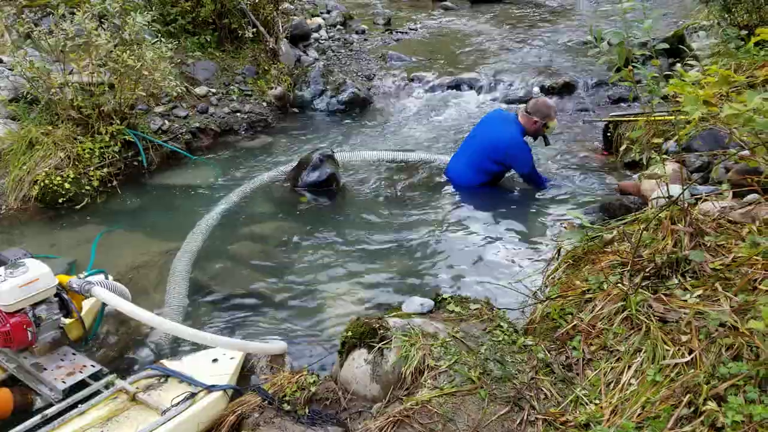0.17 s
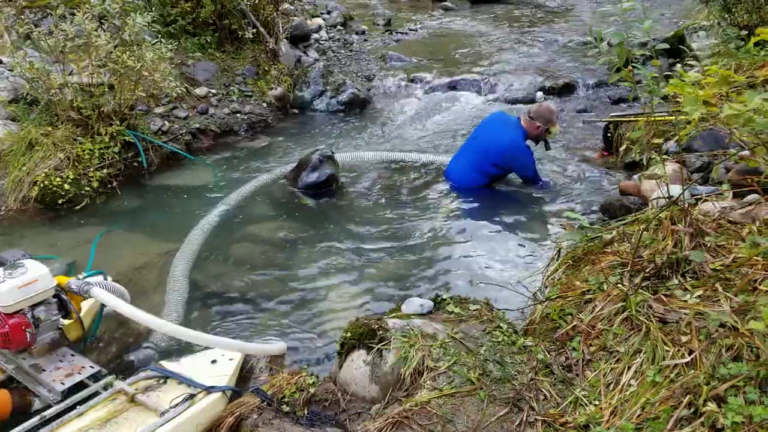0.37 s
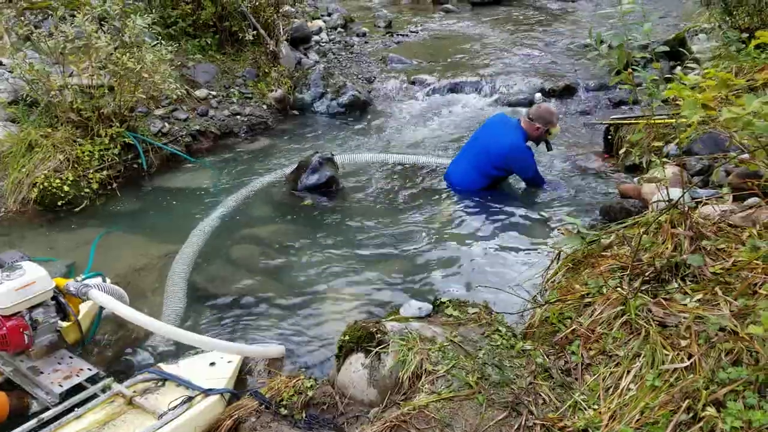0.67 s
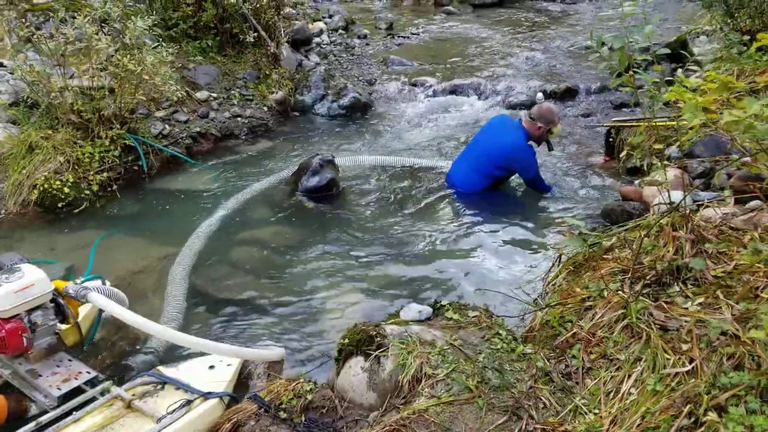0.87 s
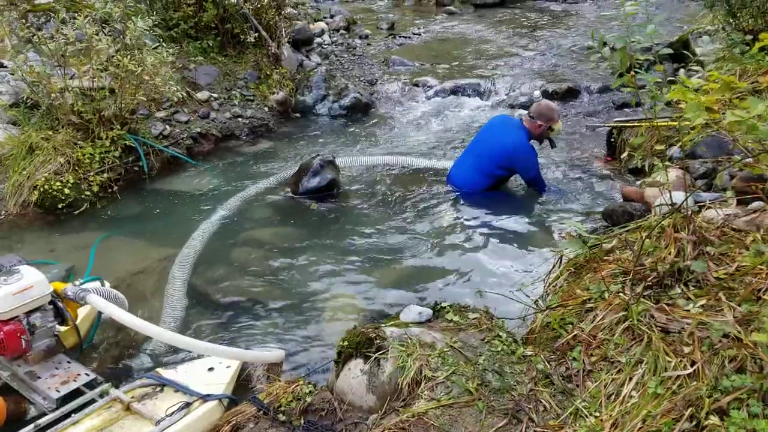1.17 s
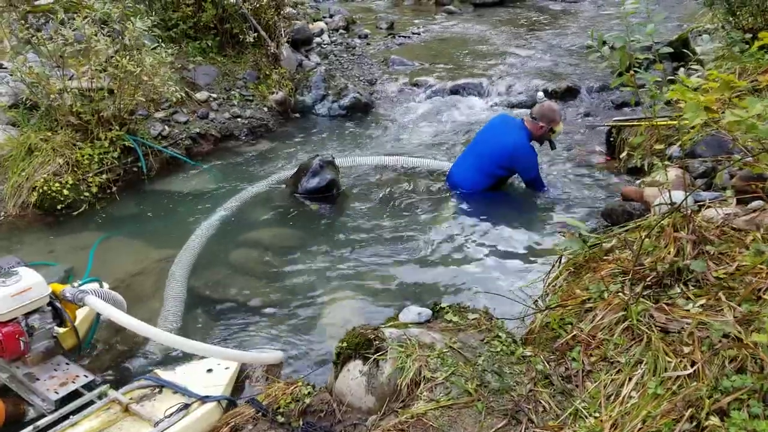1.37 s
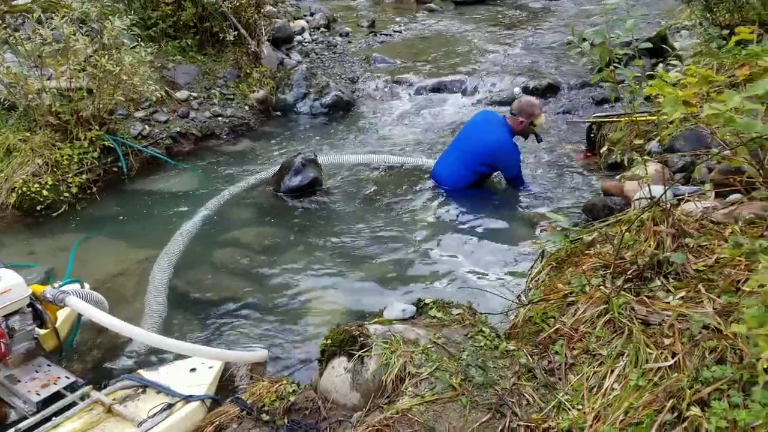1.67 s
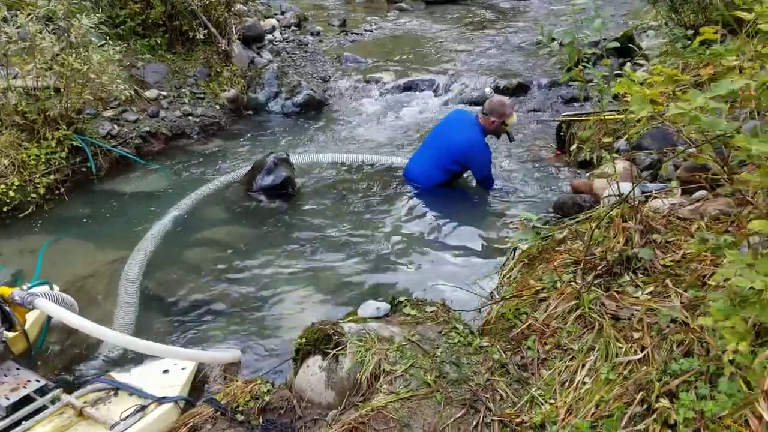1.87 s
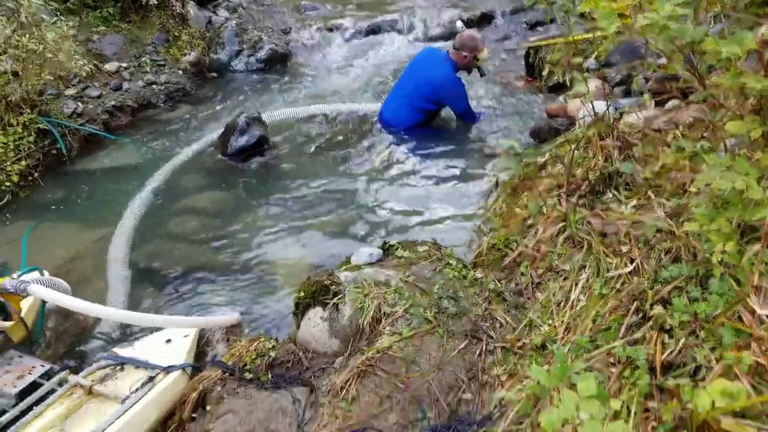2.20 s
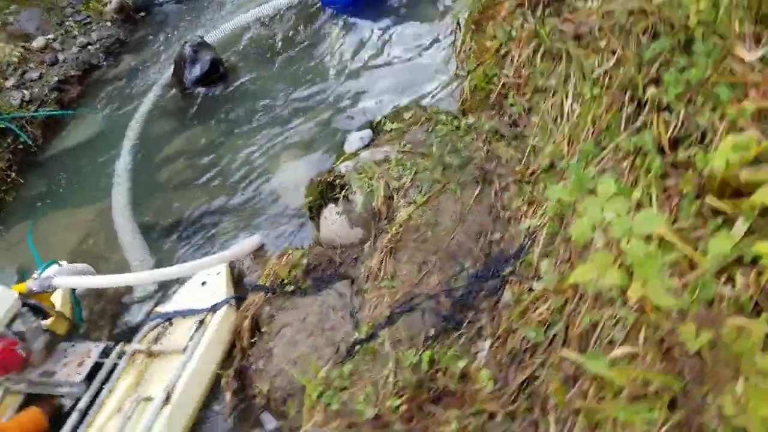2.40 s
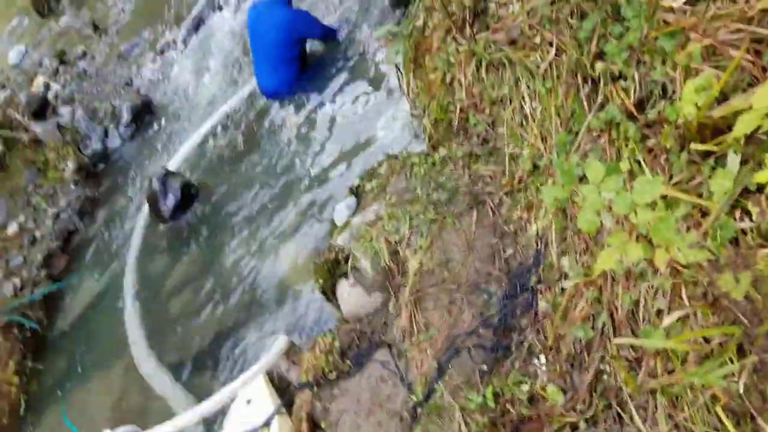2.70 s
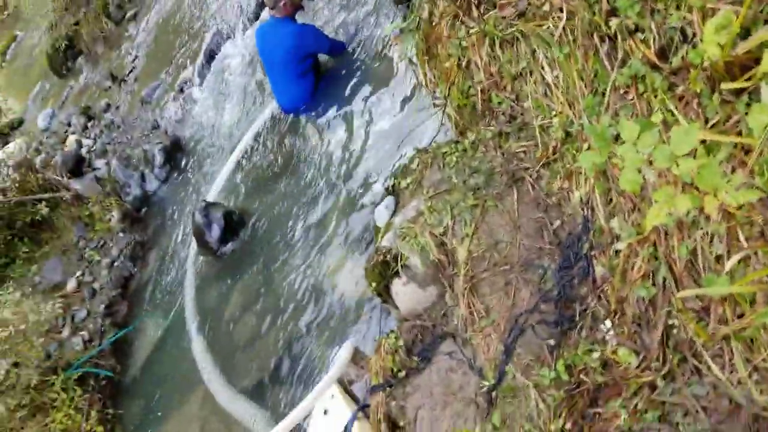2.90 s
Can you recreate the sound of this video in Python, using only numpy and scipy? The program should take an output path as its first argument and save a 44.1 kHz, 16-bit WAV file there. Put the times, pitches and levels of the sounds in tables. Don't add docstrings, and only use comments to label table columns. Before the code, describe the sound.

A small one-cylinder engine drones with a fast pulsing thump over a hissing rocky stream

```python
import sys
import numpy as np
from scipy import signal
from scipy.fft import rfft, irfft
from scipy.io import wavfile
from scipy.ndimage import uniform_filter1d

SR = 44100
rng = np.random.default_rng(int(sys.argv[2]) if len(sys.argv) > 2 else 0)


def digitize_waveform(pressure):
    field = np.atleast_2d(pressure).T
    bounded = np.clip(field, -1, 1)
    quanta = np.round(bounded * 32767).astype(np.int16)
    wavfile.write(sys.argv[1], SR, quanta)


def magnitude_from_level(level_db):
    exponent = np.asarray(level_db, float) / 20
    return 10 ** exponent


N = 134505

# (time [s], share turned [0-1])
TURN = [
    (0, 0.066),
    (1.9, 0.31),
    (2.25, 0.36),
    (2.5, 0.84),
    (3.05, 0.96),
]
SIDES = np.array([[.5], [-.5]])


def evened(x):
    return x / np.sqrt(np.mean(abs(x) ** 2) + 1e-20)


def read(points, hz):
    f, value = np.transpose(points)
    return np.interp(np.log(hz + 1), np.log(f + 1), value)


def curve(points, t):
    return np.interp(t, *np.transpose(points))


def drift(t, top_hz):
    rates = np.geomspace(top_hz / 20, top_hz, num=20)
    return evened(sum(np.sin(2 * np.pi * (f * t + rng.random())) / np.sqrt(f) for f in rates))


def tint(x, db_of_hz):
    hz = np.fft.rfftfreq(x.shape[-1], 1 / SR)
    return irfft(rfft(x) * magnitude_from_level(db_of_hz(hz)), x.shape[-1])


def bump(hz, centre_hz, octaves):
    return np.exp(-(np.log2((hz + 1) / centre_hz) / octaves) ** 2)


def crank():
    # (time [s], firing rate [1/s])
    speed = [(0, 28.3), (.65, 28.33), (.75, 28.45), (1.3, 28.46), (1.9, 28.64), (1.97, 28.3), (2.24, 28.3),
             (2.34, 28.57), (2.72, 28.57), (2.82, 28.4), (3.05, 28.3)]
    first_firing_s = .0947
    turns = np.cumsum(curve(speed, np.arange(N) / SR)) / SR
    return turns - turns[round(first_firing_s * SR)] + 10


def causal_phase(order, db, ends_db):
    known_order = np.r_[0, order, 64]
    known_db = np.r_[ends_db[0], db, ends_db[1]]
    log_gain = np.log(magnitude_from_level(np.interp(np.arange(65), known_order, known_db)))
    return -signal.hilbert(np.r_[log_gain, log_gain[-2:0:-1]]).imag


def exhaust(turns):
    # (multiple of the firing rate, level [dB])
    pipe = [(1, -28.4), (2, -4.3), (3, 0.0), (4, -4.6), (5, -4.1), (6, -9.8), (7, -9.0), (8, -14.7),
            (9, -5.5), (10, -13.7), (11, -11.5), (12, -12.5), (13, -23.8), (14, -19.7), (15, -19.0),
            (16, -22.3), (17, -30.0), (18, -21.9), (19, -20.6), (20, -30.9), (21, -27.6), (22, -31.5),
            (23, -30.6), (24, -28.9), (25, -25.2), (26, -33.1)]
    # (time [s], level [dB])
    load = [
        (0, 0),
        (.5, -1.5),
        (1.2, -2),
        (2, -2),
        (2.5, -2),
        (3.05, -2.5),
    ]
    exhaust_db, uneven_db, lift_db_per_order = -16.5, 0.8, 0.2682
    stroke_db, stroke_rad, stroke_full_order = .7, .09, 6
    piston_lead_turns, waver_db = .165, .6
    chamber_order, chamber_lag_rad = 5.5, .7

    order, db = np.transpose(pipe)
    t = np.arange(N) / SR
    firing_phase = causal_phase(order, db, (-80, -45))
    piston_phase = causal_phase(order[1::2], db[1::2], (-130, -45))
    piston_phase = piston_phase + 2 * np.pi * piston_lead_turns * np.arange(128)
    strokes = evened(uniform_filter1d(rng.standard_normal((128, 32, 2)), size=3, axis=1))
    tone = 0
    for o, order_db in pipe:
        share = min((o / stroke_full_order) ** 2, 1)
        push, slip = (share * np.interp(turns - .2, np.arange(128), strokes[:, o, k]) for k in (0, 1))
        waver = waver_db * np.sqrt(o / 9) * drift(t[::64], 9.8).repeat(64)[:N]
        level = magnitude_from_level(order_db + lift_db_per_order * o + stroke_db * push + waver)
        phase = firing_phase[o] if o % 2 or 9 <= o <= 12 else piston_phase[o]
        phase = phase + stroke_rad * slip - chamber_lag_rad * (o > chamber_order)
        tone = tone - level * np.cos(2 * np.pi * o * turns + phase)
    uneven = np.interp(turns + .5, np.arange(128), rng.standard_normal(128))
    return magnitude_from_level(exhaust_db + uneven_db * uneven + curve(load, t)) * evened(tone)


def fan_whine():
    fan_hz, fan_width_hz, fan_db = 1397, 7.9, -43.5
    t = np.arange(N) / SR
    tone = np.sin(2 * np.pi * np.cumsum(fan_hz + fan_width_hz * drift(t, 10)) / SR)
    return tone * magnitude_from_level(fan_db + 2 * drift(t, 8.76) - 4.5 * curve(TURN, t))


def rumble():
    # (frequency [Hz], density [dB per Hz])
    churn = [(30, -8), (60, -1), (120, 5.5), (250, 1.5), (400, -2), (700, -25), (1200, -47)]
    return magnitude_from_level(-32.5) * evened(tint(rng.standard_normal(N), lambda hz: read(churn, hz)))


def puffs(turns):
    rise_s, decay_s, uneven_db = 0.00041, .012, 1.2
    size = magnitude_from_level(uneven_db * rng.standard_normal((128, 2)))
    gate = 0
    for k, (at_turn, db) in enumerate([(-.03, 0), (.6, -12)]):
        since = turns - at_turn
        quickened_age = since % 1 / 12.5
        pulse = np.minimum(quickened_age / rise_s, 1) * np.exp(-quickened_age / decay_s)
        gate = gate + magnitude_from_level(db) * size[since.astype(int), k] * pulse
    return gate


def spray():
    splashes_per_s, spread_db, spray_db, decay_s = 210, 6.5, -21, 0.00077
    size = magnitude_from_level(spread_db * np.minimum(rng.exponential(1, N), 3.0))
    splashes = size * (rng.random(N) < splashes_per_s / SR)
    return magnitude_from_level(spray_db) * signal.oaconvolve(splashes, np.exp(-np.arange(800) / SR / decay_s))[:N]


def stream(turns):
    # (frequency [Hz], level over the stream [dB])
    puff_colour = [(400, -8), (1000, -7), (2100, -2.5), (4000, -4), (7000, -3), (11000, 4), (16000, 4)]
    patchy_db, swell_db, flicker_db = 0.41, .5, 1.0
    white = rng.standard_normal((2, N))
    gated = white * spray() + tint(white * puffs(turns), lambda hz: read(puff_colour, hz))
    _, t, (water, bursts) = signal.stft(np.array([white, gated]), SR, nperseg=256, noverlap=192)
    patches = uniform_filter1d(rng.standard_normal(water.shape[1:]), size=5, axis=0)
    patches = evened(uniform_filter1d(patches, size=40, axis=1))
    uneven_db = patchy_db * patches + swell_db * drift(t, 4.25) + flicker_db * drift(t, 60)
    return water * magnitude_from_level(uneven_db) + bursts


def clacks():
    # (time [s], peak [dB], centre [Hz], width [octaves], left-right [dB])
    stones = [(.255, 11.5, 6000, 1.5, 0), (.447, 12, 9000, 0.72, -5), (0.529, 15, 8500, 2.4, -1),
              (0.5507, 2, 7000, 1.2, 18), (0.7557, 9, 2900, 0.87, 0), (0.758, 13, 7000, 0.4, 4),
              (0.767, 8, 6900, 0.4, 3), (0.9531, 15.5, 11000, 1.8, -1), (1.0142, 13, 4300, 2, 5),
              (1.0374, 14.5, 5500, 1.1, 1), (1.153, 12.5, 11000, 0.85, -11), (1.335, 8, 4070, 2.1, 5),
              (1.36, 11.5, 2500, 0.6, -4), (1.5974, 13, 3300, 0.52, -1), (1.735, 11, 9000, 1, -1),
              (2.035, 12.5, 6500, 1.7, 2), (2.0953, 17, 13400, .8, -2), (2.244, 9, 5000, 2.4, 8),
              (2.2931, 20, 5500, 2.1, 7), (2.2949, 18.5, 10000, 1.8, 4), (2.333, 7, 4500, 1.3, 16),
              (2.349, 11, 5500, 1.6, 7), (2.421, 14.5, 12000, 0.94, 2), (2.452, 9, 10000, 1.1, 10),
              (2.488, 7, 11500, 0.67, 0), (2.624, 10, 13000, 0.76, 0), (2.6351, 15, 5400, 0.98, -10),
              (1.52, 6, 6000, 3, -7), (2.678, 17, 4000, 4.5, -3), (2.776, 12, 7940, 1.27, -12),
              (2.802, 9, 13000, .7, 0), (2.85, 11, 12000, .7, 0), (2.873, 12.5, 11000, 2.36, -7),
              (2.976, 13, 13000, .7, 0), (3.012, 8, 13000, 0.57, 0)]
    # (time [s], level [dB], frequency [Hz], left-right [dB])
    ticks = [
        (.7560, 21, 2800, 0),
        (1.0141, 19.5, 3700, 2),
        (1.0364, 12, 3800, 0),
        (2.2438, 19.5, 5000, 8),
        (2.2936, 17, 2800, 0),
    ]
    rise_s, decay_s, tail_s, tail_db, banded_db = .0008, .002, .012, -15, 1.6
    out = np.zeros((2, N))
    t = np.arange(2048) / SR
    fall = np.exp(-t / decay_s) + magnitude_from_level(tail_db) * np.exp(-t / tail_s)
    shape = (1 - np.exp(-t / rise_s)) * fall
    for s, db, centre_hz, octaves, pan_db in stones:
        bands = banded_db * evened(uniform_filter1d(rng.standard_normal(1025), size=25))
        noise = rng.standard_normal((2, 2048))
        burst = tint(noise, lambda hz: bands - 9 * (np.log2((hz + 1) / centre_hz) / octaves) ** 2) * shape
        burst = np.array([burst[0], .8 * burst[0] + .6 * burst[1]])
        burst = burst * magnitude_from_level(db + 4 + SIDES * pan_db)
        start = round(s * SR)
        out[:, start:start + 2048] += burst[:, :N - start]
    for s, db, hz, pan_db in ticks:
        cycles = (np.arange(N) / SR - s) * hz
        out += magnitude_from_level(db + SIDES * pan_db) * np.sin(2 * np.pi * cycles) * np.exp(-(cycles * 1.15) ** 2)
    return out


def gulps():
    # (time [s], peak [dB], start [Hz], end [Hz], length [s])
    hose = [
        (1.012, -20, 290, 290, .045),
        (1.018, -23, 360, 365, .03),
        (1.26, -24, 214, 226, .08),
    ]
    out = np.zeros(N)
    for s, db, start_hz, end_hz, length_s in hose:
        u = np.arange(0, 1, 1 / (length_s * SR))
        tone = np.sin(2 * np.pi * np.cumsum(start_hz + (end_hz - start_hz) * u) / SR)
        out[round(s * SR):][:len(u)] += magnitude_from_level(db) * np.sin(np.pi * u ** 0.98) * tone
    return out


def ports(water, knocks):
    # (frequency [Hz], density [dB per Hz])
    left, left_turned = [(400, -59.5), (800, -57.5), (1400, -58), (3200, -58), (6500, -64.5), (8800, -75.5),
                         (11000, -77), (16000, -73.5)], [(400, -53), (800, -58), (1400, -59), (3200, -68.5), (6500, -72.5),
                                       (8800, -86), (11000, -75.5), (16000, -75)]
    right, right_turned = [(400, -78), (800, -53), (1400, -50), (3200, -56.5), (4500, -63.5), (5600, -74.5),
                           (9000, -70), (16000, -80.5)], [(400, -74), (800, -56.5), (1400, -51.5), (3200, -58.5),
                                          (4500, -67.5), (7000, -67), (11000, -75.5), (16000, -72)]
    # (frequency [Hz], width [octaves], held level [dB], turned [dB])
    left_peaks, right_peaks = [(1750, 0.13, 1.5, 4.5), (4360, 0.39, 4, 2), (7000, 0.15, 5.5, 9)], [(2070, 0.21, 4, 4.5), (2115, 0.083, 5.5, 6),
                                                   (6960, 0.075, 10.5, -18), (8800, 0.058, -10.5, -2),
                                                   (11000, 0.11, 6.5, -2.5)]
    # (frequency [Hz], left-right likeness [0-1])
    likeness = [(300, 0.21), (700, 1), (1500, 0.77), (3000, 0.25), (7000, 0.23), (15000, 0.067)]
    ports_db, lead_s, lead_turned_s = 40.5, 0.00025, 0.00013

    hz, t, hits = signal.stft(knocks, SR, nperseg=256, noverlap=192)
    hz = hz[:, None]
    turn = np.clip(curve(TURN, t), 0, 1)
    same = np.clip(read(likeness, hz), 0, 1)
    z = np.array([water[0], same * water[0] + np.sqrt(1 - same ** 2) * water[1]]) + hits
    colours = [(left, left_turned, left_peaks), (right, right_turned, right_peaks)]
    for c, (held, turned, peaks) in enumerate(colours):
        db = (1 - turn) * read(held, hz) + turn * read(turned, hz)
        db = db - 12 * np.maximum(np.log2(450 / (hz + 1)), 0)
        db = db + sum((a + (b - a) * turn) * bump(hz, f, w) for f, w, a, b in peaks)
        db = db - 5 * 4 * turn * (1 - turn) * bump(hz, 1500, 0.66)
        db = db - 1.5 * turn ** 4 * bump(hz, 5400, .7)
        z[c] *= magnitude_from_level(db + ports_db)
    z[0] *= np.exp(2j * np.pi * hz * (lead_s + (lead_turned_s - lead_s) * turn))
    return signal.istft(z, SR, nperseg=256, noverlap=192)[1][:, :N]


def scene():
    exhaust_pan_db, low_lead_s = -1.46, 0.00012
    turns = crank()
    low = exhaust(turns) + rumble() + gulps()
    low_left = np.roll(low, -round(low_lead_s * SR))
    fan = fan_whine()
    low = np.array([low_left, low]) * magnitude_from_level(SIDES * exhaust_pan_db)
    low = low + np.array([.5 * fan, 4.1 * fan])
    return low + ports(stream(turns), clacks())


def band_limit(x):
    return signal.sosfilt(signal.butter(12, 16870, fs=SR, output="sos"), x)


def record(dry):
    start_s, fade_in_s, edge_hz = .0692, .0012, 15850
    opened = dry * np.clip((np.arange(N) / SR - start_s) / fade_in_s, 0, 1)
    soft = opened / (1 + abs(opened) ** 6) ** (1 / 6)
    low_pass = signal.firwin(511, edge_hz, window=("kaiser", 9), fs=SR)
    cut = signal.oaconvolve(soft, low_pass[None], "same")
    return band_limit(0.97 * cut)


dry = scene()
out = record(dry)
digitize_waveform(out)
```